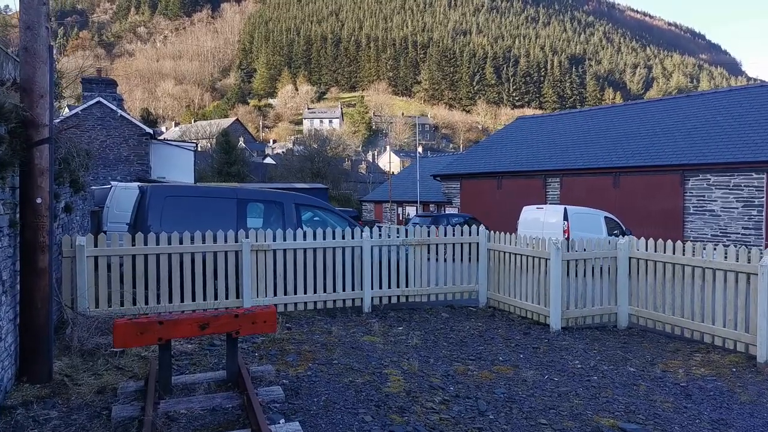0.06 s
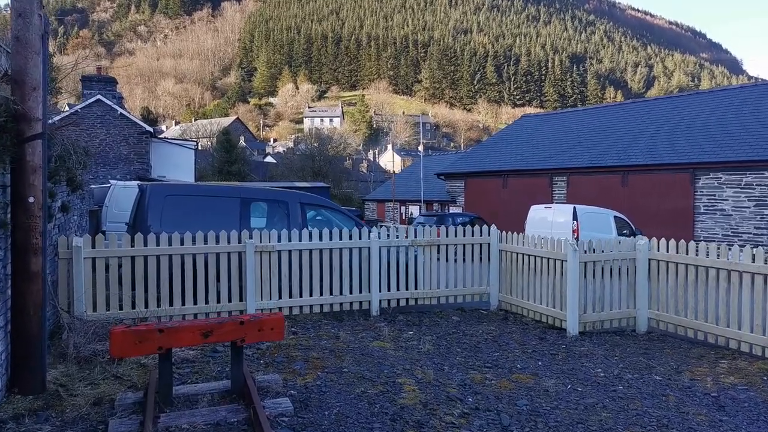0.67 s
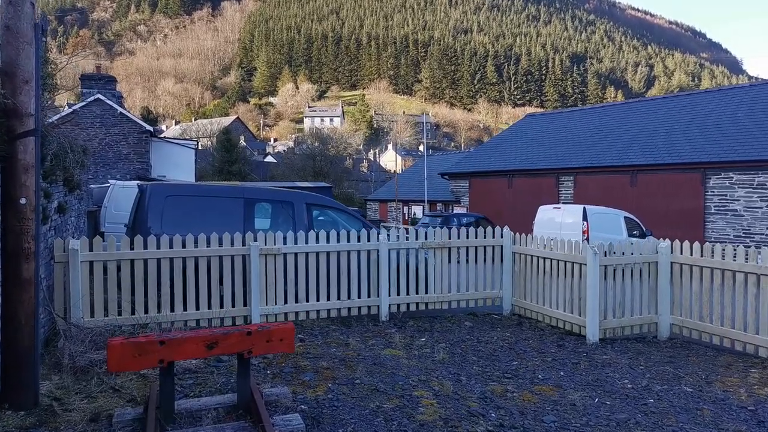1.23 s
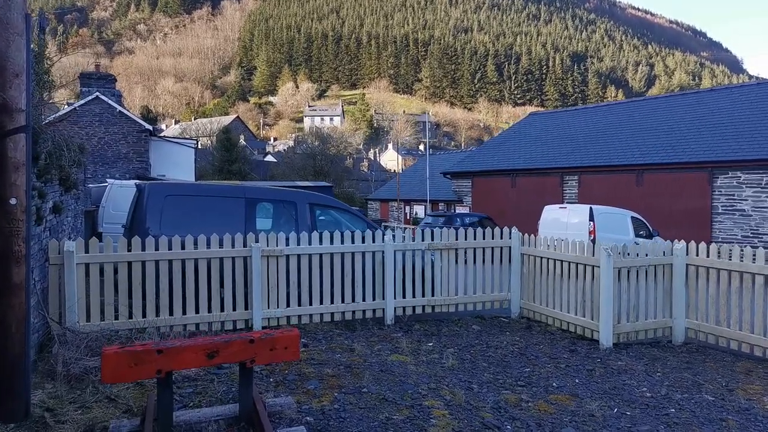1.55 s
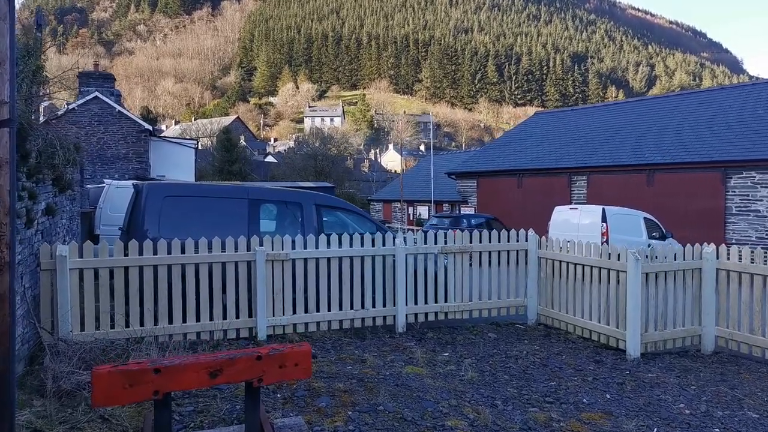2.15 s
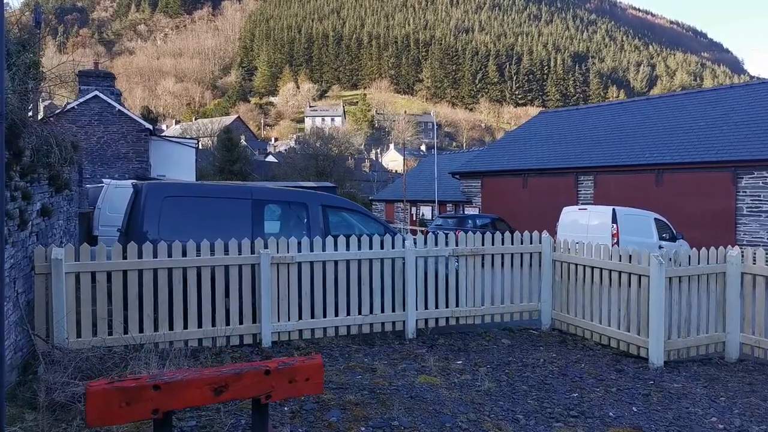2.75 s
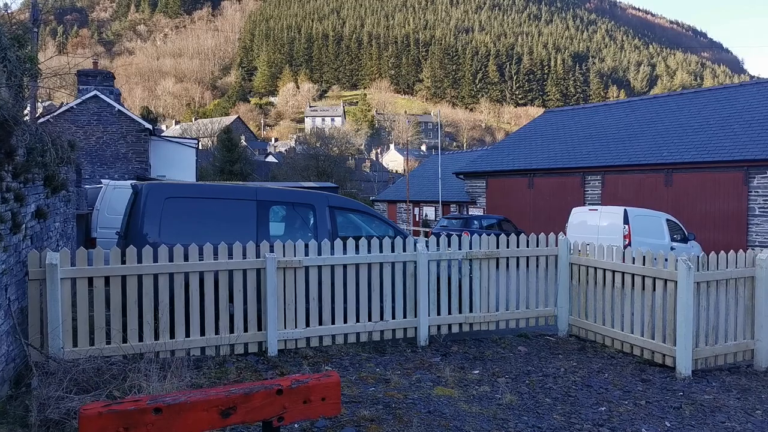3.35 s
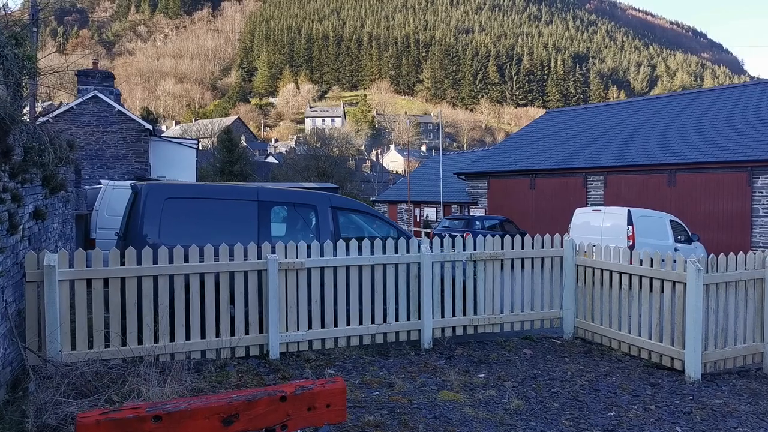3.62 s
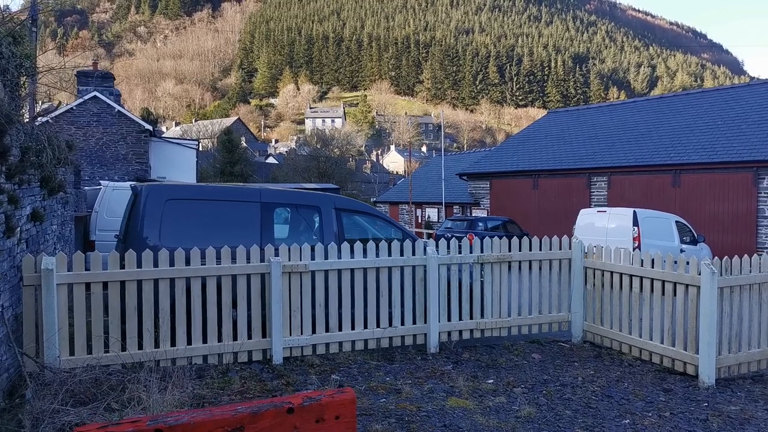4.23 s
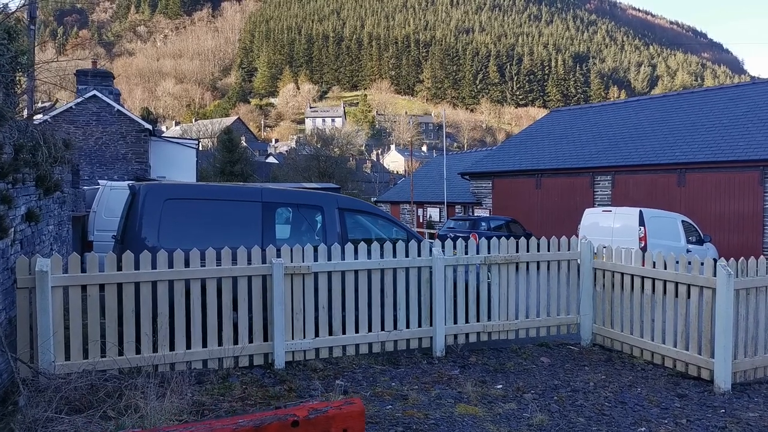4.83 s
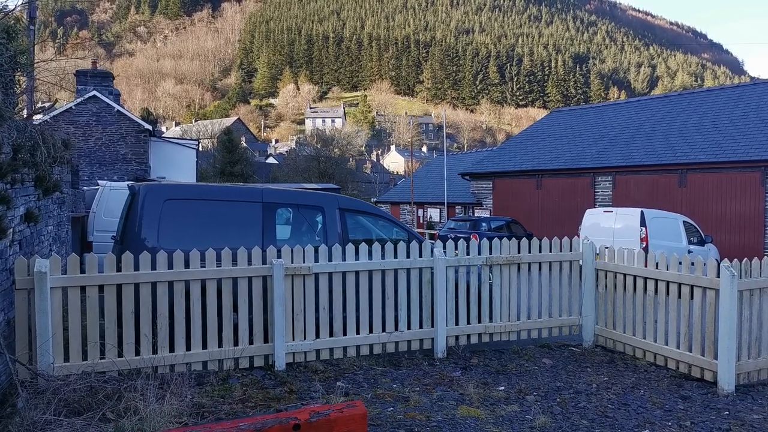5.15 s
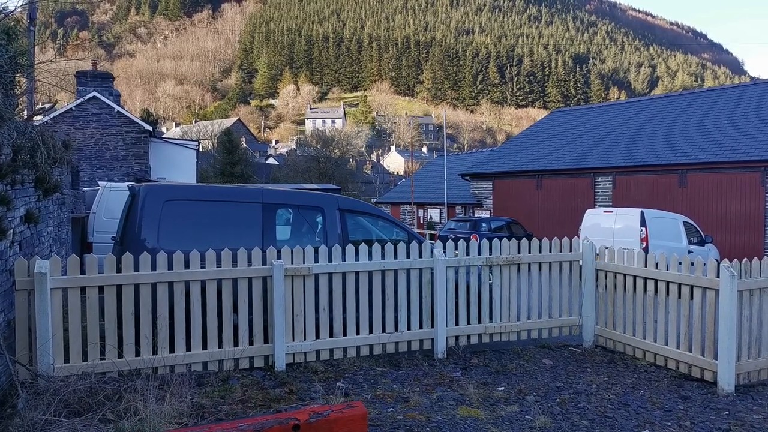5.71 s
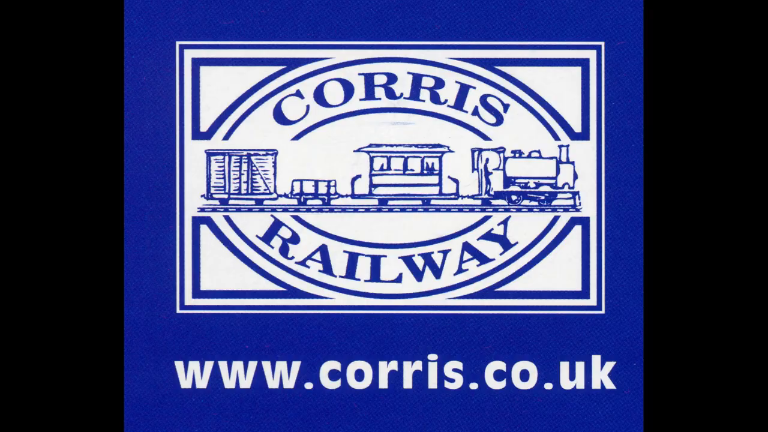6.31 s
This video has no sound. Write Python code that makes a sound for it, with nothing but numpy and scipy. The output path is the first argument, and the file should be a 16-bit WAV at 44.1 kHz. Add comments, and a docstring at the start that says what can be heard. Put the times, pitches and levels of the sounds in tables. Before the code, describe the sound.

A small rail wagon rolls slowly, heard close from on board. Its wheels rumble and grind while couplings knock, a bearing groans briefly, a latch clacks and loose boards tap. Two more bursts of heavy clanks and buffer bumps follow, the second with clicking, ringing steel. The rumble then sinks as the wagon comes to rest. A sparrow and thin bird whistles sit behind, over the soft hush of a village yard.

```python
"""A narrow-gauge wagon rolls slowly to rest in a village yard, heard from on board.
Its couplings snatch and knock through frame and body while the wheels rumble and grind on the rails.
Buffers bump, boards tap, loose fittings click and rattle, a latch clacks and a dry bearing groans.
Behind it a sparrow chirps and small birds whistle thinly over a soft hush; the buildings answer."""
import sys
import numpy as np
from scipy import signal
from scipy.fft import rfft, irfft, next_fast_len
from scipy.io import wavfile
from scipy.ndimage import map_coordinates

SR = 44100
rng = np.random.default_rng(int(sys.argv[2]) if len(sys.argv) > 2 else 0)


def generate_wav(signal):
    """Clip the signal to [-1, 1] and save it as 16-bit WAV at the path in sys.argv[1]."""
    frames = np.transpose(np.atleast_2d(signal))
    scaled = np.clip(frames, -1, 1) * 32767
    pcm = np.round(scaled).astype(np.int16)
    wavfile.write(sys.argv[1], SR, pcm)


N = 289719
END_S = 5.948  # the sound cuts off here


def amp(db):
    """Decibels to gain."""
    return 10 ** (np.asarray(db) / 20)


def along(points, hz):
    """Read a curve of (f/Hz, value) points on a log frequency axis."""
    freqs, values = np.transpose(points)
    return np.interp(np.log(hz + 1), np.log(freqs + 1), values)


def clock():
    """The time of each sample, in seconds."""
    return np.arange(N) / SR


def wobble(rate):
    """A smooth random curve with `rate` knots a second."""
    return map_coordinates(rng.standard_normal(int(N * rate / SR) + 4), [clock() * rate])


def bin_hz():
    """The frequencies of the padded FFT."""
    return np.fft.rfftfreq(2 * next_fast_len((N + SR) // 2), 1 / SR)


def filtered(x, response):
    """Play x through a frequency response."""
    return irfft(rfft(x, 2 * (len(bin_hz()) - 1)) * response)[..., :N]


def body(spectrum, peaks=1):
    """A resonating body: a broad EQ curve times its peaks, as a minimum-phase filter of unit power."""
    gain = amp(along(spectrum, bin_hz())) * peaks
    gain /= np.sqrt(np.mean(gain ** 2) + 1e-20)
    cepstrum = irfft(np.log(np.maximum(gain, 1e-6)))
    half = len(cepstrum) // 2
    cepstrum[1:half] *= 2
    cepstrum[half + 1:] = 0
    return np.exp(rfft(cepstrum))


def resonances(modes, lift_db):
    """Bell-shaped peaks standing on a flat gain of 1."""
    hz = bin_hz()
    return 1 + sum(amp(lift_db + db) / (1 + (2 * (hz - f) / width) ** 2) for f, width, db in modes)


def blows(hits, rise_s):
    """The envelope of (t/s, level/dB, t60/s) hits; their powers add."""
    power, t = np.zeros(N + SR), np.arange(SR) / SR
    for start, db, t60 in hits:
        power[round(start * SR):][:SR] += (amp(db - 60 * t / t60) * (1 - np.exp(-t / rise_s))) ** 2
    return np.sqrt(power[:N])


# Stereo image, nearly mono in the bass: f/Hz, left-right correlation
CORRELATION = [(60, 1), (160, 0.98), (350, 0.8), (600, 0.9), (1000, 0.64), (3000, 0.0544), (12000, 0.2)]
def stereo_angle(hz):
    """How far apart the two sides are at a frequency, in radians."""
    return np.arccos(np.clip(along(CORRELATION, hz), -1, 1))


def shaken(envelope, response):
    """A random force follows the envelope and shakes a body into stereo noise."""
    turn = stereo_angle(bin_hz()) / 2
    pushes = np.sign(rng.standard_normal((2, N)))
    mid, side = filtered(envelope * pushes, response * np.array([np.cos(turn), np.sin(turn)]))
    return np.array([mid + side, mid - side])


def struck(hits, modes, rise_s, detune):
    """Each (t/s, level/dB, pitch factor) hit rings the modes with fresh tuning, strength and width."""
    out, t = np.zeros((2, N + SR)), np.arange(SR // 2) / SR
    for start, db, pitch in hits:
        scatter = rng.standard_normal((len(modes), 3))
        for (f, mode_db, t60), (mistune, width, stray_db) in zip(modes, scatter):
            hz = f * pitch * (1 + detune * mistune)
            apart = width * stereo_angle(hz) * np.array([[.5], [-.5]])
            phase = 2 * np.pi * (hz * t + rng.random()) + apart
            envelope = amp(db + mode_db + stray_db - 60 * t / t60) * (1 - np.exp(-t / rise_s))
            out[:, round(start * SR):][:, :len(t)] += envelope * np.sin(phase)
    return out[:, :N]


# Tone of the ambient bed: f/Hz, level/dB
AIR_EQ = [(180, -40), (300, -12.5), (502, -13.5), (573, -13), (1310, -21), (2350, -20), (5740, -26.5),
          (6350, -30.5), (7740, -30.5), (9140, -36), (15800, -27.5)]
def air():
    """The hush of the valley: gently drifting noise, a little to the right."""
    return shaken(amp(-65 + .89 * wobble(3.316)), body(AIR_EQ)) * amp([[-2.5], [2.5]])


# Reverb time of the yard: f/Hz, t60/s
YARD_DECAY = [(200, 0.84), (1000, 0.2), (4000, 0.51), (12000, 0.73)]
def yard(x):
    """Walls scatter the sound into a tail; each frequency dies at its own speed."""
    hz, t, noise = signal.stft(rng.standard_normal((2, SR)), SR, nperseg=256)
    tail = signal.istft(noise * amp(-60 * t / along(YARD_DECAY, hz)[:, None]), SR, nperseg=256)[1]
    tail = np.pad(tail / np.linalg.norm(tail[0]), ((0, 0), (SR // 80, 0)))  # 12.5 ms pre-delay
    return signal.fftconvolve(np.atleast_2d(x), tail, axes=1)[:, :N]


def wall_echoes(x, count=6):
    """Early reflections off the nearest houses, different on each side."""
    delays_s = rng.uniform(.004, .055, (2, count))
    sides = [sum(np.pad(x, (round(delay * SR), 0))[:N] for delay in side) for side in delays_s]
    return np.array(sides) / np.sqrt(count)


def far_notes(count=36):
    """Random note cues for birds across the valley; the low notes are the louder."""
    notes, range_hz = [], (3400, 7400)
    for when, length, height, bend in rng.random((count, 4)):
        length_s = np.interp(length, [0, 1], (.03, .1))
        start_hz, late_hz = np.interp([height, height + (bend - .7) / 4], [0, 1], range_hz)
        notes.append((END_S * when, length_s, start_hz, late_hz, -70 - 4 * height))
    return notes


# Thin falling whistles: t/s, length/s, level/dB
WHISTLE_CUES = [(1.672, 0.048, -59), (1.932, 0.14, -68), (2.155, 0.14, -64), (2.366, 0.11, -64),
                (3.553, 0.14, -69), (4.53, 0.1, -65.5), (4.732, 0.098, -61), (4.868, 0.095, -60),
                (5.04, 0.072, -64), (5.293, 0.049, -59.5), (5.334, 0.06, -66.5), (5.518, 0.14, -65.5),
                (5.739, 0.075, -61)]
# A far bird's slow song: t/s, length/s, start f/Hz, f/Hz before the last flick, level/dB
SONG_NOTES = [(1.026, 0.085, 3750, 3560, -64), (4.923, .16, 4450, 4260, -67), (5.053, 0.2, 5760, 5850, -67),
              (5.417, 0.085, 5600, 5800, -65), (5.582, 0.11, 5020, 4460, -65.5),
              (5.715, 0.13, 3890, 3730, -65), (5.828, 0.036, 3450, 3220, -64),
              (5.87, 0.068, 5775, 5720, -69)]
def small_birds():
    """Thin, raspy notes that glide and end in a flick, mostly down: whistles, a twitter, a slow song."""
    whistles = [(start, length, 8130, 7200, db) for start, length, db in WHISTLE_CUES]
    twitter = [(3.316 + k * .087, .04, 7200, 5700, -63.5) for k in range(4)]  # a run of quick falls
    rasp = 1 + .014 * wobble(700) + .006 * wobble(60)
    flutter_db = 2.5 * wobble(80)
    out = np.zeros(N)
    for start, length, start_hz, late_hz, db in [*whistles, *twitter, *SONG_NOTES, *far_notes()]:
        progress = (clock() - start) / length
        on = (progress > 0) & (progress < 1)
        glide = .65 * progress[on] + .9 * progress[on] ** 8
        hz = (start_hz + (late_hz - start_hz) * glide) * rasp[on]
        envelope = amp(db + .5 + flutter_db[on]) * np.cbrt(np.sin(np.pi * progress[on]))
        out[on] += envelope * np.sin(2 * np.pi * np.cumsum(hz) / SR)
    return out


# Sparrow chirps: t/s, level/dB, first f/Hz, syllable length/s, fade per syllable/dB,
# place of the pitch crest in the syllable (0-1)
CHIRP_CUES = [(-0.05, -43, 4680, 0.033, 1.5, 0.54), (0.849, -49, 4740, 0.038, 1, 0.66),
              (1.31, -42.5, 4665, 0.052, 4, 0.31), (2.327, -47, 4355, .046, 11, 0.71),
              (2.995, -47, 4634, 0.034, 0, 0.44)]
def sparrow(syllables=3, pitch_step=.855):
    """A chirp is a run of rough, arched syllables, each lower and a little flatter than the last."""
    rasp = 1 + .025 * wobble(700) + .014 * wobble(140)
    stress_db = 2 * wobble(90)
    out = np.zeros(N)
    for start, db, first_hz, length, fade_db, crest in CHIRP_CUES:
        for k in range(syllables):
            progress = (clock() - start) / length - k
            on = (progress > 0) & (progress < 1)
            arch = 1 - .52 * .95 ** k * (progress[on] - crest) ** 2
            hz = first_hz * pitch_step ** k * arch * rasp[on]
            envelope = amp(db - k * fade_db + stress_db[on]) * np.sin(np.pi * progress[on])
            out[on] += envelope * np.sin(2 * np.pi * np.cumsum(hz) / SR)
    return out


# Pitch and level curve of the groan: t/s, f/Hz, level/dB
GROAN_CURVE = [(0.339, 268.2, -40), (0.365, 313, -20.5), (0.374, 308, -34), (0.386, 296, -17),
               (0.42, 250, -47.5)]
def bearing_groan():
    """A dry bearing sticks and slips as the load comes on: a short, rough low note."""
    times, pitch, db = np.transpose(GROAN_CURVE)
    t = clock()
    hz = np.interp(t, times, pitch) * (1 + .048 * wobble(180))
    envelope = amp(np.interp(t, times, db)) * (t > times[0]) * (t < times[-1])
    return envelope * np.sin(2 * np.pi * np.cumsum(hz) / SR)


# The latch shuts and bounces: t/s, level/dB
LATCH_HITS = [(0.747, -32), (0.781, -48.5)]
# Ring of the latch: f/Hz, level/dB, t60/s
LATCH_MODES = [(1203, 1.5, 0.043), (1310, -8, .05), (2080, -15, 0.073), (2450, -17, 0.097),
               (2830, -19, .08)]
def latch():
    """A hard steel contact with a short, clear ring."""
    return struck([(t, db, 1) for t, db in LATCH_HITS], LATCH_MODES, rise_s=.00072, detune=.003)


# Ring of the coupling links: f/Hz, level/dB, t60/s
LINK_MODES = [(1255, -4, .16), (1390, -7, .2), (1664, -3.5, .2), (1694, 1, 0.24), (1770, -2.5, .2),
              (1940, -6.5, .22), (2240, -2.5, 0.13), (2720, -7, .16)]
def links(hits):
    """Each (t/s, level/dB) snatch sets the steel links ringing."""
    return struck([(t, db, 1) for t, db in hits], LINK_MODES, rise_s=.001, detune=.004)


# Clicks of loose fittings: t/s, level/dB, relative low ring/dB, relative top fizz/dB, t60/s
CLICK_HITS = [(0.096, -67.5, 2, 9.5, 0.043), (0.158, -59.5, 17, -3.5, 0.15), (0.172, -50, -1.5, 0, 0.43),
              (0.627, -53.5, 8, 7.5, 0.029), (0.671, -66.5, 6, 20, .15), (0.748, -68.5, 16, -13, 0.36),
              (1.53, -68, 3, -2.5, 1), (1.839, -64.5, 5, 13.5, 0.24), (2.179, -62, 12.5, 3.5, 0.33),
              (2.55, -50.5, 3.5, -1, 0.13), (2.657, -63.5, 14.5, 0, 0.2), (3.225, -61, -4, -3.5, 0.31),
              (3.342, -66.5, -14, 1, 1), (3.664, -67, -7.5, 7, .1), (3.75, -71, 19, -13, 0.22),
              (3.818, -63, 20, -16.5, 0.25), (4.027, -55.5, 13.5, 1.5, 0.22), (4.058, -38, 5, -7.5, 0.28),
              (4.08, -38.5, -10, 1.5, 0.11), (4.218, -54, 0, -3.5, 0.87), (4.399, -38, -18, -1, 0.14),
              (4.432, -44.5, -2, -27, 0.3), (4.725, -70.5, 10, 10, 0.092), (4.868, -60, -8.5, 0, .04),
              (5.797, -21.5, -28, -32.5, 0.0084)]
# A steel part slips and rings on: t/s, level/dB
SLIP_HITS = [(4.396, -33), (4.438, -33), (4.489, -39)]
# Resonances of pins and catches: f/Hz, width/Hz, peak/dB
PIN_PEAKS = [(2220, 240, -3.5), (3900, 620, -7), (5240, 420, 6), (8140, 350, -3)]
# Four colours of steel, from dark to bright: f/Hz, level/dB
CLANG_EQ = [(300, -24), (520, -3.5), (650, -6), (800, 3), (980, -3.5), (1200, -18), (1430, -12),
            (2300, -27), (5000, -55), (9000, -74.5)]
RATTLE_EQ = [(500, -35.5), (1200, 3.5), (1700, 1), (2400, -2), (3300, -10), (5200, -18.5), (8000, -30.5),
             (15000, -56.5)]
TICK_EQ = [(800, -31), (2500, -4.5), (4800, -1.5), (6500, -5.5), (8000, -0.5), (10000, -12), (12500, -14.5),
           (15500, -19)]
FIZZ_EQ = [(5000, -28.5), (9000, -11.5), (12500, -5), (15500, -6)]
def fittings():
    """Small steel parts click, and tremble faintly with the roll; one slips and rings on."""
    chatter = amp(1.2 * wobble(260))
    tick = blows([(t, db, t60) for t, db, low, top, t60 in CLICK_HITS], rise_s=.00038)
    ring = blows([(t, db + low, t60) for t, db, low, top, t60 in CLICK_HITS], rise_s=.00055)
    fizz = blows([(t, db + top, t60) for t, db, low, top, t60 in CLICK_HITS], rise_s=.0008)
    clang = blows([(t, db, .34) for t, db in SLIP_HITS], rise_s=.0032)
    tremble = amp(roll_db() - 41 + 2 * wobble(22))
    pins = body(TICK_EQ, resonances(PIN_PEAKS, lift_db=-8))
    bright = shaken(np.hypot(tick, tremble) * chatter, pins)
    bright += shaken(np.hypot(fizz, tremble) * chatter, body(FIZZ_EQ))
    chain = links([(t, db + low - 19.5) for t, db, low, *_ in CLICK_HITS])
    return bright + chain + shaken(ring * chatter, body(RATTLE_EQ)) + shaken(clang, body(CLANG_EQ))


# Taps of loose boards: t/s, level/dB, f/Hz
BOARD_HITS = [(0.22, -22.5, 742), (0.294, -27.5, 512), (0.404, -25, 561), (0.45, -28, 633),
              (0.665, -33.5, 457), (0.7, -32.5, 422), (0.847, -27, 564), (0.898, -29.5, 612),
              (1.196, -36.5, 429), (1.339, -31.5, 537), (1.444, -27, 617), (1.574, -26.5, 617),
              (1.617, -31.5, 549), (1.843, -38.5, 603)]
# Ring of a board: multiple of its pitch, level/dB, t60/s
BOARD_MODES = [(0.619, -5.5, 0.12), (.83, -5, 0.23), (1.002, -2, 0.13), (1.23, -2, 0.071),
               (1.47, -16, 0.12), (2.3, -15.5, 0.044)]
def boards():
    """A board taps the frame: a short wooden note over a brief scuff on steel."""
    note = struck(BOARD_HITS, BOARD_MODES, rise_s=.00098, detune=.026)
    scuff = blows([(t, db - 2, .14) for t, db, hz in BOARD_HITS], rise_s=.0015)
    return amp(-3) * note + shaken(scuff, body(CLANK_EQ, resonances(DRAW_GEAR_PEAKS, lift_db=-1.5)))


# Low ring of the wagon frame: f/Hz, level/dB, t60/s before damping
FRAME_MODES = [(100.54, -14, 0.75), (155.8, -1.5, 0.34), (181.8, 0.5, 0.25), (232.7, -10.5, 0.39),
               (296.2, -8, 0.299)]
def frame(hits, damping, rise_s):
    """Each (t/s, level/dB) blow rings the frame's modes with fresh strength and tuning."""
    out, t = np.zeros(N + SR), np.arange(SR) / SR
    for start, db in hits:
        attack = amp(db) * (1 - np.exp(-t / rise_s))
        for hz, mode_db, t60 in FRAME_MODES:
            decay = amp(mode_db + rng.normal(0, 4.2) - 60 * damping * t / t60)
            tone = np.sin(2 * np.pi * hz * rng.normal(1, .025) * t)
            out[round(start * SR):][:SR] += attack * decay * tone
    return out[:N]


# Soft bumps of the frame: t/s, level/dB, f/Hz
BUMP_HITS = [(0.164, -11, 196.4), (0.232, -16.5, 215.7), (2.551, -23, 199), (3.136, -27.5, 175.4),
             (3.264, -25.5, 172.7), (3.755, -31.5, 159), (4.032, -11, 189), (4.12, -15.5, 236.5),
             (4.22, -15, 178.4), (4.716, -26.5, 164), (4.896, -25.5, 176), (5.073, -25.5, 153.6),
             (5.207, -14, 196.6)]
# Ring of the sprung buffer: multiple of its pitch, level/dB, t60/s
BUFFER_MODES = [(.5, -16, 0.31), (0.998, -0.5, 0.15), (2.3, -26.5, 0.17)]
def buffers(rebound_s=.036, rebound_db=-9.5):
    """The slack takes up softly and rebounds once: the buffer gives a low note and the frame answers."""
    contacts = [hit for t, db, hz in BUMP_HITS for hit in ((t, db), (t + rebound_s, db + rebound_db))]
    note = struck([(t, db + 5, hz) for t, db, hz in BUMP_HITS], BUFFER_MODES, rise_s=.013, detune=.015)
    return note + thuds(contacts) + frame([(t, db - 8) for t, db in contacts], damping=1.1, rise_s=.008)


# Tone of a thud: f/Hz, level/dB
THUD_EQ = [(20, -43.5), (70, -16.5), (150, 1), (195, 4), (245, -6.5), (300, -12), (420, -23), (900, -38),
           (3000, -100)]
def thuds(hits):
    """Each (t/s, level/dB) contact gives a dull burst of low noise."""
    return shaken(blows([(t, db - 7.5, .2) for t, db in hits], rise_s=.00088), body(THUD_EQ))


# How hard the wagon rolls, one list before and one after the big knock: t/s, level/dB
ROLL_CURVES = [
    [(0.0, -44), (0.47, -36), (2.0, -36.5), (2.93, -42), (3.69, -46.5), (4.0, -44)],
    [(4.56, -52.5), (5.246, -48), (5.46, -56), (5.788, -59), (5.88, -61.5)],
]
def roll_db():
    """The level of the roll at each sample, sinking as the wagon comes to rest."""
    return np.interp(clock(), *np.vstack(ROLL_CURVES).T)


# Tone of the treads' rumble and of the grinding on the rail: f/Hz, level/dB
RUMBLE_EQ = [(11, -33), (18, -13), (59, 0.5), (91, 1), (130, -6), (171, 0), (220, -7), (258, -12.5),
             (302, -19), (331, -23), (420, -21), (550, -47.5), (920, -120)]
GRIND_EQ = [(160, -31.5), (280, -6.5), (307, -1.5), (333, -10), (408, -5.5), (639, -11.5), (739, -10),
            (1300, -24.5), (2500, -34), (3250, -74), (5500, -120)]
def wheels(full_roll_db=-38):
    """Rough treads shake the wagon; rust and grit grind in spurts. Knocks and taps stir up both."""
    jolts = [*KNOCK_HITS, *BOARD_HITS]
    sway = blows([(t, db - 12.5, 1.08) for t, db, *_ in jolts], rise_s=.036)
    shudder = blows([(t, db - 24.5, .6) for t, db, *_ in jolts], rise_s=.021)
    grind_db = full_roll_db - 11.5 + .87 * (roll_db() - full_roll_db)  # fades slower than the rumble
    rumble = np.hypot(amp(roll_db() + 4), sway) * amp(1.7 * wobble(11))
    grind = np.hypot(amp(grind_db), shudder) * amp(1.8 * wobble(35))
    steel = resonances(DRAW_GEAR_PEAKS, lift_db=-10)
    return shaken(rumble, body(RUMBLE_EQ)) + shaken(grind, body(GRIND_EQ, steel))


# Couplings and buffers strike: t/s, level/dB, relative rattle/dB, relative hollow ring/dB
KNOCK_HITS = [(0.158, -29, -7, -14.5), (0.176, -22.5, -9.5, -6), (0.219, -20, -26, -23),
              (0.746, -29.5, -17, -7), (1.661, -31.5, -14.5, -9), (2.169, -38, -19, -2),
              (2.586, -17.5, -30, -14), (2.604, -24.5, -17, -9.5), (2.643, -14, -25, -22),
              (2.777, -34.5, -17, -1), (2.804, -33, -20, -5.5), (4.03, -29, -2.5, -6.5),
              (4.062, -17, -11, -8.5), (4.079, -13, -17, -9), (4.088, -14.5, -18.5, -5),
              (4.121, -15.5, -26, -1), (4.136, -19.5, -8, -9.5), (4.221, -26.5, -19, 0.5)]
# Resonances of the steel draw gear: f/Hz, width/Hz, peak/dB
DRAW_GEAR_PEAKS = [(297, 56, 4.5), (476.3, 32, 4.5), (525.4, 15, 7), (585.6, 16, 4.5), (677, 24, -2.5),
                   (783, 53, -5), (1005, 9.3, 6), (1274, 25, -0.5), (1440, 29, -4), (1932, 55, 4),
                   (2260, 19, 0)]
# Ring of the hollow wagon body: f/Hz, level/dB, t60/s
SHELL_MODES = [(227.8, 1, 0.53), (294.9, -3, 0.53), (395.5, -3.5, .26), (419, -4.5, 0.3), (492.7, 3, .2),
               (521.5, 2.5, 0.22), (650, -12, 0.26), (730, -13, 0.18), (828, -11.5, 0.21),
               (982, -11.5, 0.14)]
# Tone of a knock's low boom and of its midrange clank: f/Hz, level/dB
BOOM_EQ = [(20, -16.5), (45, -2.5), (75, -4), (120, -13.5), (180, 2), (240, -5.5), (320, -7.5), (450, -8.5),
           (900, -69.5), (3000, -100)]
CLANK_EQ = [(150, -21.5), (300, 2), (480, 0.5), (660, 0), (980, -17.5), (1200, -15.5), (2500, -54),
            (6000, -59)]
def couplings():
    """A knock booms in the wagon, rings its hollow body, clanks the draw gear and cracks the links."""
    booms = [(t, .63 * db - 10) for t, db, *_ in KNOCK_HITS]
    boom = blows([(t, db + 4, .2) for t, db in booms], rise_s=.0069)
    # a firm first contact, then the parts chatter against each other
    contact = blows([(t, db, .035) for t, db, *_ in KNOCK_HITS], rise_s=.001)
    clank = contact + blows([(t, db - 7.5, .14) for t, db, *_ in KNOCK_HITS], rise_s=.022)
    crack = blows([(t, db + rattle - 2.5, .08) for t, db, rattle, _ in KNOCK_HITS], rise_s=.001)
    chain = links([(t, db + rattle - 15) for t, db, rattle, _ in KNOCK_HITS])
    # the steel rings out more than in proportion when the blow is hard
    clang = blows([(t, 1.715 * db + 4, .11) for t, db, *_ in KNOCK_HITS], rise_s=.00078)
    ring = frame([(t, db - 8.5) for t, db in booms], damping=1.4, rise_s=.001)
    shell_hits = [(t, db + hollow - 3, 1) for t, db, _, hollow in KNOCK_HITS]
    shell = struck(shell_hits, SHELL_MODES, rise_s=.0056, detune=.0053)
    steel = resonances(DRAW_GEAR_PEAKS, lift_db=-.5)
    metal = shaken(clank, body(CLANK_EQ, steel))
    metal += shaken(crack, body(RATTLE_EQ, steel))
    metal += shaken(clang, body(CLANG_EQ, steel))
    return ring + shell + chain + shaken(boom, body(BOOM_EQ)) + metal


# Pan curve of the wagon: t/s, left minus right/dB
WAGON_PAN = [(0.2, -6.5), (3.69, -4), (5.42, 0), (5.9, -6)]
def panned(x, lag_s=.00031):
    """The wagon's noise sits to the right: it reaches the left side later and weaker."""
    times, pan_db = np.transpose(WAGON_PAN)
    half = np.array([[.5], [-.5]])
    delayed = filtered(x, np.exp(-2j * np.pi * bin_hz() * lag_s * half))
    return delayed * amp(half * np.interp(clock(), times, pan_db))


def scene():
    """The wagon close by, a sparrow in the yard, small birds farther off, and the hush of the valley."""
    clatter = couplings() + boards() + latch() + buffers() + fittings() + bearing_groan()
    near, far = sparrow(), small_birds()
    birds = amp(-4.5) * near + amp(-6) * far
    bird_echoes = amp(-8) * wall_echoes(near + far) + yard(amp(-10.5) * near + amp(-9) * far)
    background = birds + bird_echoes + air()
    return background + panned(wheels() + clatter) + amp(-26) * yard(clatter)


# Stereo tilt of the mix: f/Hz, left minus right/dB
STEREO_TILT = [(60, 0), (200, 2), (600, 0), (1300, 3), (2400, -1), (4400, 1.5), (8000, 6.5), (15000, 6)]
def record(dry, top_hz=15980):
    """The master: an abrupt ending, a brighter left side and a steep high cut."""
    hz = bin_hz()
    tilt_db = along(STEREO_TILT, hz) / 2
    gate = np.clip((END_S - clock()) / .004, 0, 1)
    high_cut = amp(-120 * np.clip((hz - top_hz) / 300, 0, 1))
    return filtered(dry * gate, amp([tilt_db, -tilt_db]) * high_cut)


dry = scene()
out = record(dry)
generate_wav(out)
```